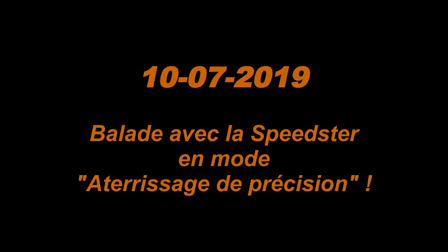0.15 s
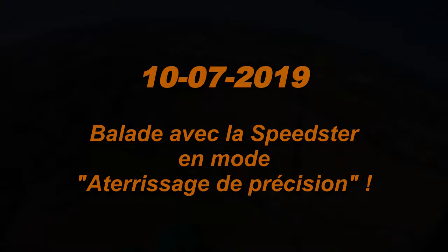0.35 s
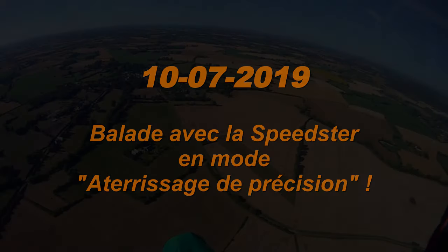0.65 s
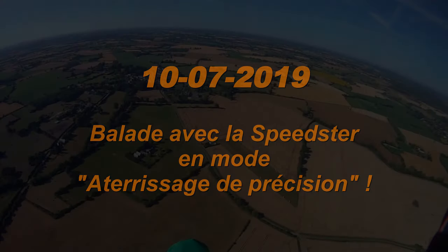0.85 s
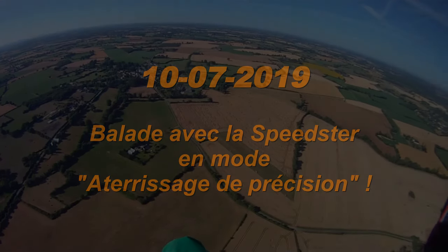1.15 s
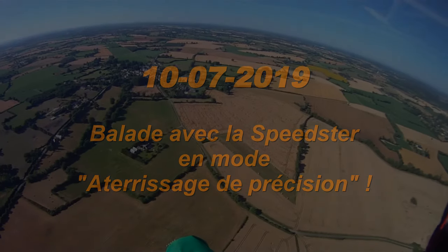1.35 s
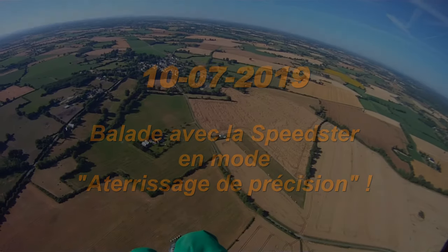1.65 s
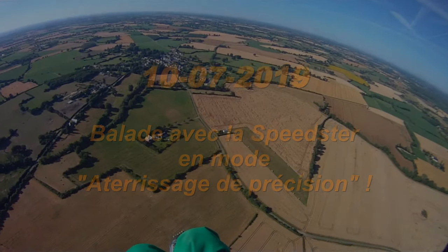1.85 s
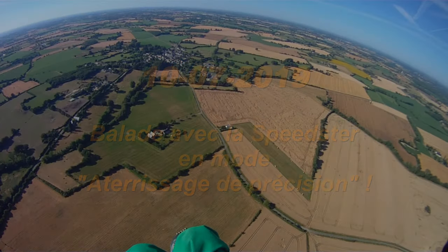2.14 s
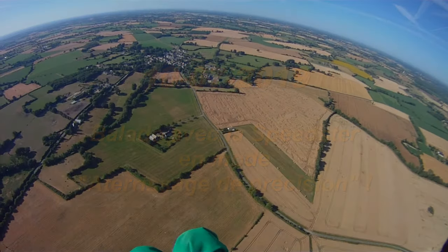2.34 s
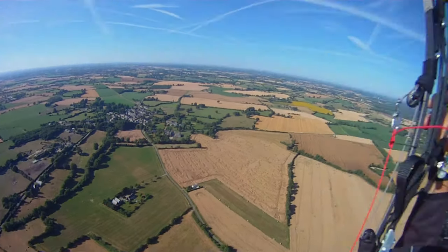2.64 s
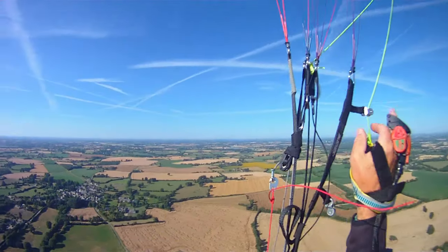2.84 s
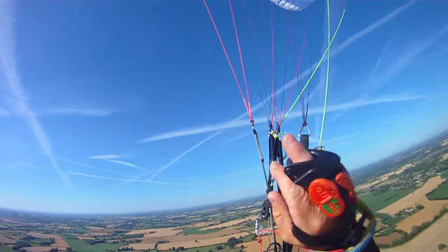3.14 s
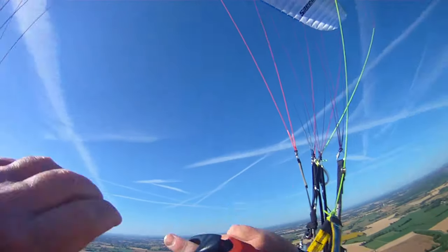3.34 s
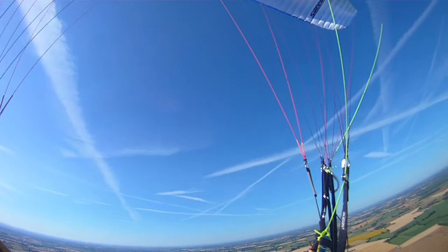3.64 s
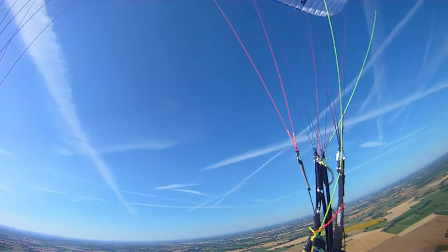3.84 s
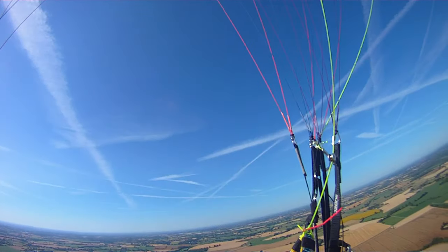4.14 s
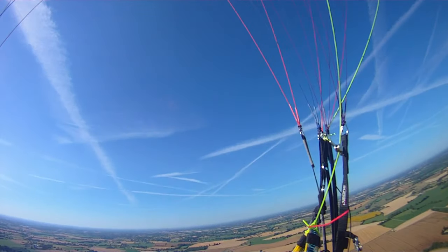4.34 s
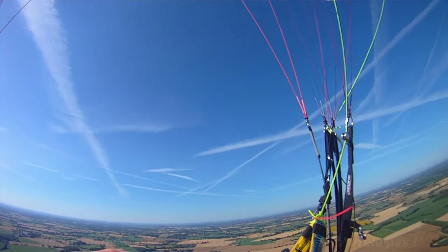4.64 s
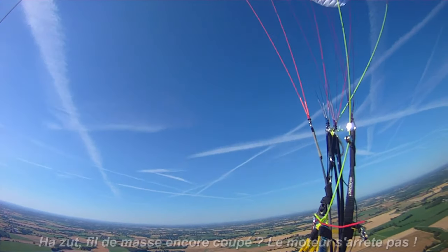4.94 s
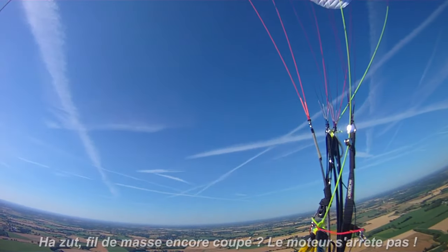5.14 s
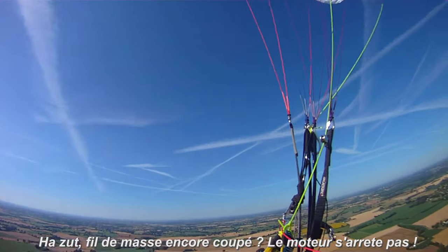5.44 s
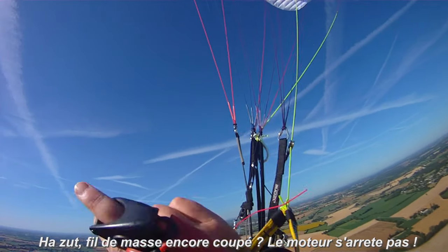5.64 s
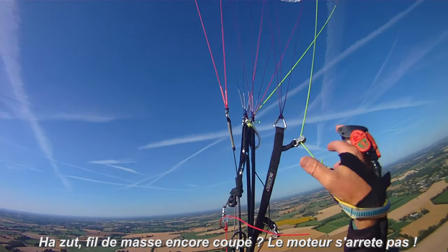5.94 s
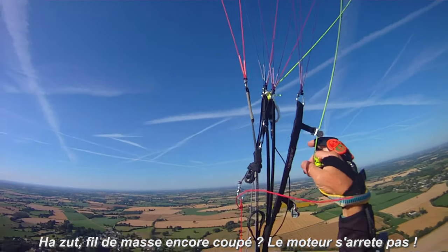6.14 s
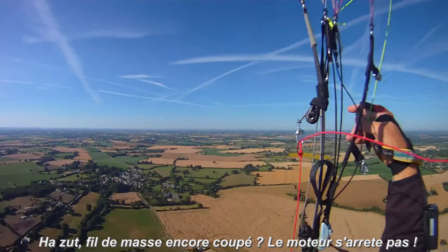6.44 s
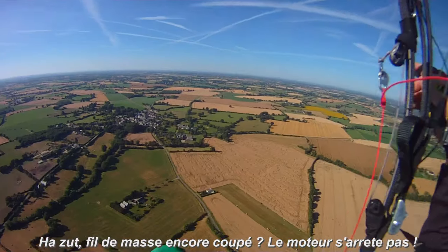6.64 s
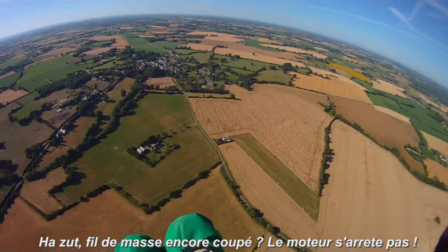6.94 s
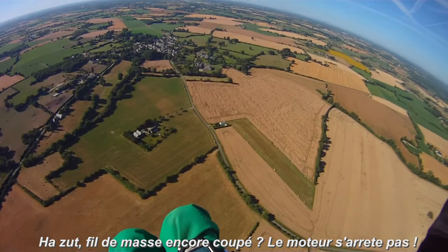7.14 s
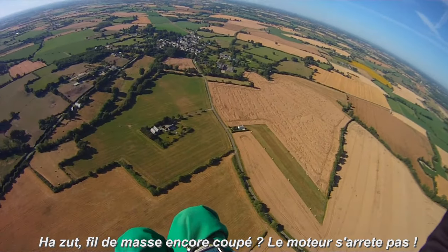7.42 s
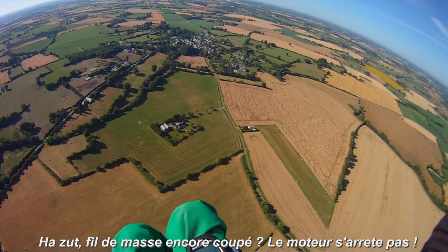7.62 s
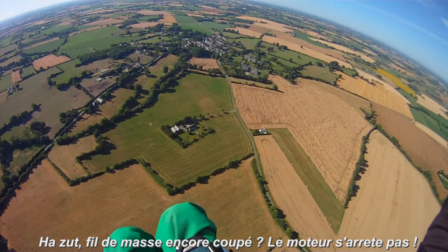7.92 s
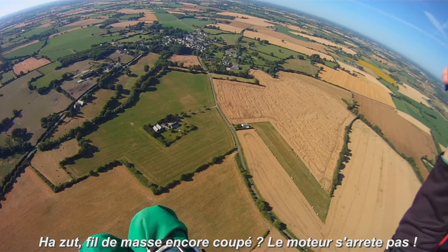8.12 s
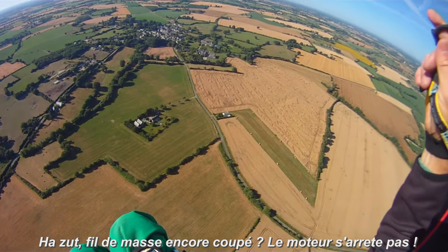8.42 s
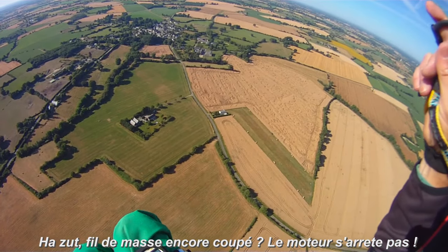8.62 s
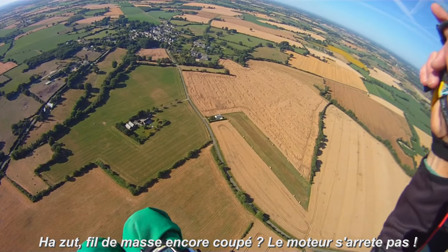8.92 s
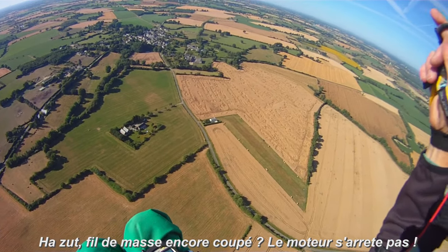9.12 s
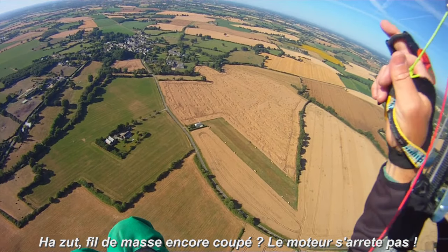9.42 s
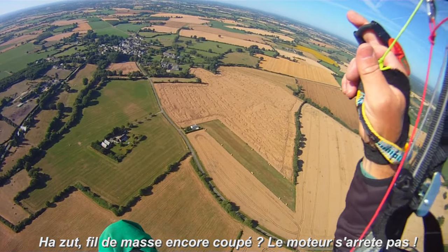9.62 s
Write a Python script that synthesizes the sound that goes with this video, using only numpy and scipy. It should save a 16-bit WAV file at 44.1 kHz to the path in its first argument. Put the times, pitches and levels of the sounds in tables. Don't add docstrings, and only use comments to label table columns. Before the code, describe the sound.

A helmet microphone in open air fades in from silence on wind roar and a small two-stroke hunting at idle close behind. The head turns away: wind falls to irregular slaps, the engine's bark comes forward, and the camera housing gives two hollow clicks. A buckle ticks faintly. Turning back, more clicks, and the wind roar returns, strengthening and fluttering at the end.

```python
import sys
import numpy as np
from scipy import signal
from scipy.fft import rfft, irfft, next_fast_len
from scipy.io import wavfile
from scipy.ndimage import uniform_filter1d, map_coordinates

SR = 44100
rng = np.random.default_rng(int(sys.argv[2]) if len(sys.argv) > 2 else 0)


def output_pcm(signal):
    pcm = np.clip(np.atleast_2d(signal).T, -1, 1) * 32767
    wavfile.write(sys.argv[1], SR, np.round(pcm).astype(np.int16))


def how_loud(loudness_db):
    steps = np.asarray(loudness_db, float) / 20
    return 10 ** steps


N = 430857

# (frequency [Hz], density [dB])
PREAMP_SPECTRUM = [(5000, -20), (7500, 9), (9700, -8), (11500, -10.5), (13200, -11), (15300, -9)]
# (time [s], share [0-1])
HEAD_TURN = [(2.6, 0), (2.8, 0.66), (3.5, 0.83), (3.9, 1), (4.7, 0.83), (5.5, 0.9), (5.95, 1), (6.2, 0.4),
             (6.55, 0.1)]
# (time [s], level [dB])
WIND_AHEAD = [(0, -32.5), (.6, -36.5), (1.2, -36), (1.799, -40), (2.1, -38), (2.5, -39), (6.6, -31.5),
              (6.77, -31.5), (6.9, -36.5), (7.12, -39.5), (7.38, -40.5), (7.96, -42.5), (8.41, -36.5),
              (8.84, -35.5), (8.93, -32), (9.38, -28.5), (9.42, -25), (9.77, -25.5)]
# (start [s], hold [s], level [dB])
LEE_GUSTS = [(2.705, 0.088, -48.5), (2.812, 0.063, -41), (2.91, 0.22, -52.5), (3.168, 0.077, -48),
             (3.308, 0.09, -43.5), (3.427, .03, -55), (3.553, 0.036, -47), (3.634, 0.046, -53),
             (3.867, 0.13, -48.5), (4.055, 0.1, -42.5), (4.201, 0.043, -42.5), (4.283, 0.079, -35.5),
             (4.39, 0.044, -39), (4.464, 0.036, -36), (4.527, 0.0078, -37), (4.558, 0.048, -49),
             (4.797, 0.071, -57), (4.966, 0.033, -58), (5.123, .03, -57), (5.247, 0.12, -62),
             (5.472, .1, -52), (5.61, .08, -48.5), (5.699, 0.099, -31), (5.83, 0.05, -37.5),
             (5.896, .03, -49.5), (5.968, 0.098, -49.5), (6.125, 0.31, -62.5), (6.456, 0.17, -55.5)]
# (time [s], peak [dB], pitch [Hz], overtones [dB])
CLICKS = [
    (3.2537, -5, 1510, -26.5),
    (3.3882, -7.5, 1515, -28),
    (6.5556, -11, 1504, -26.5),
    (6.6967, -17, 1550, -28),
    (6.9661, -12, 1510, -25.5),
]
# (time [s], peak [dB])
BUCKLE_TICKS = [
    (5.23, -27.5),
]
# (frequency [Hz], width [Hz], level [dB])
BUCKLE_MODES = [(2300, 1100, -3), (3470, 1200, -2), (6000, 1500, 4.5), (7900, 1100, -13),
                (12500, 2500, -12)]
# (frequency [Hz], density [dB])
ROAR_SPECTRUM = [(15, -74), (40, -58.5), (109, -20.5), (219, -5.5), (345, .5), (480, 1), (650, 1),
                 (900, -2.5), (1200, -7), (1530, -9), (1800, -16), (2700, -23.5), (3500, -44), (7700, -120)]
BUFFET_SPECTRUM = [(25, -58), (70, -40), (130, -11), (230, -2), (450, -6), (800, -9), (1500, -12),
                   (3000, -40.5), (6000, -120)]
# (frequency [Hz], density [dB])
HISS_SPECTRUM = [(1060, -27.5), (1800, 1), (2970, -5.5), (4070, -7.5), (5220, -3.5), (6310, 0), (7020, -7),
                 (8250, -24), (10500, -26), (12500, -41), (15300, -44)]
RUMBLE_SPECTRUM = [(15, -57), (25, -19), (70, -15), (133, -9), (220, -10.5), (400, -44), (800, -120)]
# (frequency [Hz], gain [dB])
HELMET_SHADE = [(2000, -0.5), (3400, 0), (4300, -4.5), (5200, -0.5), (7000, 0)]
# (time of peak [s], peak [dB], pitch [Hz])
STRONG_SLAPS = [(2.824, -29, 432), (4.3562, -24.5, 565), (3.09, -38, 630), (3.185, -36, 551),
                (5.776, -18, 512), (3.3663, -30, 459), (3.5602, -33, 517), (3.5825, -29, 395),
                (3.8659, -37, 512), (3.9543, -26, 660), (3.992, -30, 324), (4.0605, -23.5, 526),
                (4.1253, -26.5, 537), (4.1977, -23, 512), (4.2427, -19.5, 551), (4.3147, -17.5, 480),
                (4.2837, -27, 600), (4.4366, -16.5, 630), (4.483, -21, 512), (4.5081, -23, 500),
                (4.535, -18.5, 393), (4.8149, -34, 361), (4.8616, -32.5, 352), (5.3187, -37, 294),
                (5.4937, -33, 490), (5.5227, -30, 512), (5.5623, -31.5, 565), (5.7225, -17, 424),
                (5.8123, -20.5, 520), (6.026, -34, 475)]
# (time [s], rate [firings/s])
IDLE_HUNT = [(0.0, 29.02), (0.696, 30.91), (1.853, 37.03), (2.73, 28.44), (3.977, 35.86), (4.821, 30.82),
             (5.722, 35.29), (6.375, 29.76), (7.438, 35.78), (8.581, 30.12), (9.77, 30.61)]
# (frequency [Hz], width [Hz], level [dB])
PIPE_MODES = [(1160, 51, -23), (1312, 152, 0), (1920, 60, -5.5), (2250, 64, -8), (2795, 63, -7),
              (3020, 56, -12.5), (4100, 160, -24), (5600, 140, -11), (6290, 150, -14.5)]
CRACK_MODES = [(2890, 210, 0), (3134, 390, -1)]
CASING_MODES = [(3660, 40, -3.5), (3950, 68, -8), (5070, 280, -7), (5420, 170, -9.5), (6160, 25, 1.5),
                (6300, 170, -4.5), (6763, 84, 4), (6930, 20, 7.5), (6900, 27, -3.5), (8300, 330, -29),
                (7870, 270, -33.5)]
CAVITY_MODES = [(1550, 183, 0)]
# (facing ahead [dB], gain fully turned [dB], gain over idle [dB per firing/s], wind [dB per dB])
ENGINE_LAYERS = [
    (-56.5, 9, .3, 0.8),
    (-53, -1, -0.2, 0.34),
    (-50, -5, -0.34, 0.25),
]

TURN_AWAY_S, TURN_BACK_S, TURN_S = 2.708, 6.585, 0.024
CALM_DB, LEE_DB = -40, -64


def unit(x):
    return x / np.sqrt(np.mean(x ** 2) + 1e-20)


def level(*gains):
    return 10 * np.log10(sum(g ** 2 for g in gains) + 1e-20)


def curves(rows):
    s, *cols = np.transpose(rows)
    return [np.interp(np.arange(N) / SR, s, c) for c in cols]


def wobble(rate):
    knots = rng.standard_normal(int(N * rate / SR) + 4)
    return map_coordinates(knots, [np.arange(N) * rate / SR])


def even(db):
    return how_loud(db) / np.sqrt(uniform_filter1d(how_loud(2 * db), size=6615))


def filtered(x, response):
    m = next_fast_len(N + 8192)
    return irfft(rfft(x, m) * response(np.fft.rfftfreq(m, 1 / SR)), m)[:N]


def coloured(x, spectrum):
    f, db = np.transpose(spectrum)
    return filtered(x, lambda hz: how_loud(np.interp(np.log(hz + 1), np.log(f), db)))


def resonant(x, modes):
    def response(f):
        return sum(how_loud(db) * 1j * f * w / (c * c - f * f + 1j * f * w) for c, w, db in modes)
    return filtered(x, response)


def add(track, s, sound):
    track[round(s * SR):][:len(sound)] += sound


def preamp():
    shimmer_db = 1.5 * wobble(45)
    return how_loud(-62.5 + shimmer_db) * unit(coloured(rng.standard_normal(N), PREAMP_SPECTRUM))


def housing():
    track, t = np.zeros(N), np.arange(1200) / SR
    swell = (1 - np.exp(-(t / 0.00028) ** 1.84)) * np.exp(-(t / 0.0056) ** 3.1)
    swell = swell + 0.049 * np.exp(-((t - .009) / 0.002) ** 2)
    for s, db, hz, over_db in CLICKS:
        phase = 2 * np.pi * hz * (t + 0.00018 * (1 - np.exp(-t / 0.0019)))
        over = np.sin(1.8 * phase) + .5 * np.sin(1.43 * phase)
        ring = np.sin(phase) + how_loud(over_db + 5.5) * over * how_loud(-60 * t / 0.19)
        add(track, s - .0002, how_loud(db + 1.5) * swell * ring)
    return filtered(track, lambda hz: hz ** 6 / (hz ** 6 + 950 ** 6) / (1 + (hz / 3600) ** 6))


def buckle():
    taps, t = np.zeros(N), np.arange(1200) / SR
    for s, db in BUCKLE_TICKS:
        burst = rng.standard_normal(len(t)) * (how_loud(-60 * t / 0.0022) + 0.11 * (t < .005))
        add(taps, s, how_loud(db + 12.0) * burst)
    ringing = resonant(resonant(taps, BUCKLE_MODES), BUCKLE_MODES)
    return filtered(ringing, lambda hz: 1 / (1 + (hz / 10500) ** 4))


def aside():
    t = np.arange(N) / SR
    return np.clip(np.minimum(t - TURN_AWAY_S, TURN_BACK_S - t) / TURN_S + .5, 0, 1)


def gusts():
    rise_db_s, fall_db_s = 900, 498
    t = np.arange(0, N, 32) / SR
    each = []
    for s, hold, db in LEE_GUSTS:
        slope_db = np.minimum(rise_db_s * (t - s), fall_db_s * (s + hold - t))
        each.append(how_loud(db + np.minimum(0, slope_db)))
    return np.interp(np.arange(N) / SR, t, level(how_loud(LEE_DB), *each))


def flow():
    t, away, gust_db = np.arange(N) / SR, aside(), gusts()

    def mix(ahead, lee):
        return (1 - away) * ahead + away * lee

    hold_s, hold_db = WIND_AHEAD[5]
    holding = (t > hold_s) & (t < TURN_AWAY_S + TURN_S)
    wind_db = np.where(holding, hold_db - CALM_DB, curves(WIND_AHEAD)[0] - CALM_DB)
    near_away = np.exp(-np.abs(t - TURN_AWAY_S) / 0.082)
    near_back = np.exp(-np.abs(t - TURN_BACK_S) / 0.072)
    facing_roar = level(how_loud(CALM_DB + wind_db), how_loud(-27.5) * near_away, how_loud(-36) * near_back)
    roar_db = mix(facing_roar, gust_db)

    facing_hiss = level(how_loud(-52 + 1.063 * wind_db), how_loud(-30) * near_away, how_loud(-30) * near_back)
    gust_hiss_db = CALM_DB - 11.5 + 1.23 * (gust_db - CALM_DB)
    hiss_db = mix(facing_hiss, level(how_loud(-56.5), how_loud(gust_hiss_db)))

    swell_db = uniform_filter1d(gust_db, size=4410) - LEE_DB
    lee_rumble_db = -80.5 + 0.5 * swell_db + 9.5 * curves(HEAD_TURN)[0]
    rumble_db = mix(-76.5 + 0.74 * wind_db, lee_rumble_db)

    storm_db = np.maximum(0, wind_db - 11) * (t > 7)
    depth = mix(0.38 + 0.03 * wind_db + .12 * storm_db, 3)
    dull = mix(0.044 + .1 * storm_db, 0.78)
    return roar_db, hiss_db, rumble_db, depth, dull, mix(wind_db, 0)


def wind():
    roar_db, hiss_db, rumble_db, depth, dull, _ = flow()
    lumps = .5 * wobble(24) + 0.76 * wobble(60) + 1.53 * wobble(220)
    drive = even(depth * lumps) * rng.standard_normal(N)
    dull = np.clip(dull, 0, 1)
    roar = (1 - dull) * unit(coloured(drive, ROAR_SPECTRUM)) + dull * unit(coloured(drive, BUFFET_SPECTRUM))
    fizz = even(.6 * depth * lumps + .8 * wobble(35))
    hiss = coloured(fizz * rng.standard_normal(N), HISS_SPECTRUM)
    hiss = hiss + aside() * (coloured(hiss, HELMET_SHADE) - hiss)
    rumble = coloured(even(.5 * depth * wobble(25)) * rng.standard_normal(N), RUMBLE_SPECTRUM)
    loud_roar = how_loud(roar_db + 1.11) * roar
    return loud_roar + how_loud(hiss_db + 0.5) * unit(hiss) + how_loud(rumble_db + 6.5) * unit(rumble)


def eddies():
    luck = rng.standard_normal((400, 3))
    s = TURN_AWAY_S + np.cumsum(np.exp(.5 * luck[:, 0])) / 70
    db = np.interp(s, np.arange(N) / SR, gusts()) + 9 + 3.5 * luck[:, 1]
    hz = 416 * np.exp(0.3 * luck[:, 2])
    rows = np.transpose([s, db, hz])
    return [*STRONG_SLAPS, *rows[s < TURN_BACK_S]]


def slaps():
    track, t = np.zeros(N), np.arange(-400, 400) / SR
    for s, db, hz in eddies():
        swing = -np.cos(2 * np.pi * hz * t) * np.exp(-np.abs(t * hz / 0.32) ** 1.3)
        packet = np.exp(-np.abs(t) / 0.0038) * (1 - np.exp(-(t * hz / 0.24) ** 2))
        ragged = 0.76 * rng.standard_normal(len(t)) * packet
        add(track, s + t[0], how_loud(db + 4.5) * (swing + ragged))

    def port(hz):
        treble_cut = 1 / (1 + (hz / 1300) ** 2) / (1 + (hz / 6500) ** 4)
        return treble_cut * hz ** 2 / (hz ** 2 + 150 ** 2)
    return filtered(track, port)


def crank():
    s, hz = np.transpose(IDLE_HUNT)
    k = np.interp(np.arange(N) / SR, s, np.arange(len(s)))
    eased = k // 1 + (1 - np.cos(np.pi * (k % 1))) / 2
    return np.interp(eased, np.arange(len(s)), hz)


def exhaust(step, since, luck):
    decay = 0.88 * how_loud(-60 * since / .015) + how_loud(-60 * since / 0.036)
    jet = (1 - np.exp(-since / 0.003)) * decay + 0.091
    strength = how_loud(1.1 * luck)
    bark = resonant(strength * (3 * step + jet * rng.standard_normal(N)), PIPE_MODES)
    crack = strength * (6.5 * step + how_loud(-60 * since / .025) * rng.standard_normal(N))
    crack = resonant(resonant(crack, CRACK_MODES), CRACK_MODES)
    return unit(bark) + .3 * unit(crack)


def casing(since, strength_luck, delay_luck):
    late = np.abs(since - .005 - 0.0027 * delay_luck)
    shake = (1 - np.exp(-since / 0.0025)) * how_loud(-60 * since / 0.087)
    shake = shake + 2.4 * how_loud(-60 * late / 0.011) + 0.29
    loose = how_loud(1.8 * strength_luck + 1.8 * wobble(160) + 1.8 * wobble(8))
    return unit(resonant(shake * loose * rng.standard_normal(N), CASING_MODES))


def cavity(since):
    throb = how_loud(-60 * since / 0.19) + 0.88
    return unit(resonant(resonant(throb * rng.standard_normal(N), CAVITY_MODES), CAVITY_MODES))


def engine():
    rate = crank()
    turns = np.cumsum(rate) / SR + .172
    cycle = turns.astype(int)
    since = turns % 1 / rate
    step = np.diff(cycle, prepend=0)
    luck = rng.standard_normal((400, 3))[cycle]
    turned, wind_db = curves(HEAD_TURN)[0], flow()[-1]
    layers = [exhaust(step, since, luck[:, 0]), casing(since, luck[:, 1], luck[:, 2]), cavity(since)]
    heard = np.zeros(N)
    for layer, (db, lee, fast, blown) in zip(layers, ENGINE_LAYERS):
        gain_db = db + lee * turned + fast * (rate - 33) + blown * wind_db
        heard += how_loud(gain_db) * layer
    return filtered(heard, lambda hz: 1 / np.sqrt(1 + (hz / 8300) ** 12))


def scene():
    return (preamp() + housing() + buckle() + wind() + slaps() + engine())[None]


def low_pass(x):
    return signal.sosfilt(signal.butter(12, 16250, fs=SR, output="sos"), x)


def record(dry):
    def band(hz):
        return (hz < 15300) * hz ** 2 / (hz ** 2 + 45 ** 2)
    fade_start, fade_end = 0.29, 2.87
    fade = np.clip((np.arange(N) / SR - fade_start) / (fade_end - fade_start), 0, 1)
    return low_pass(fade * filtered(dry[0], band)[None])


dry = scene()
out = record(dry)
output_pcm(out)
```